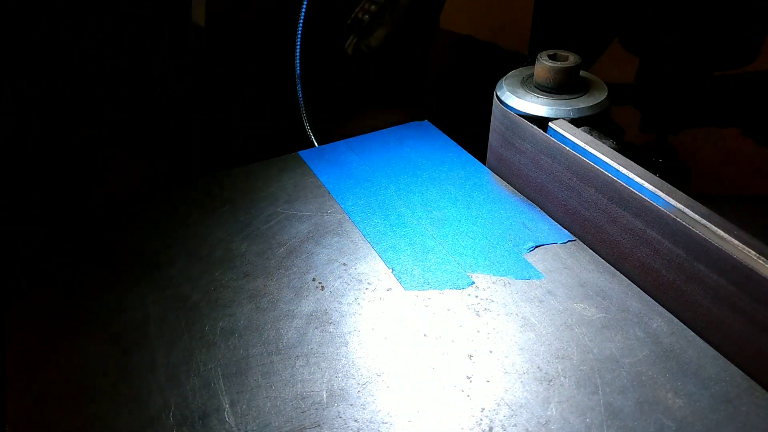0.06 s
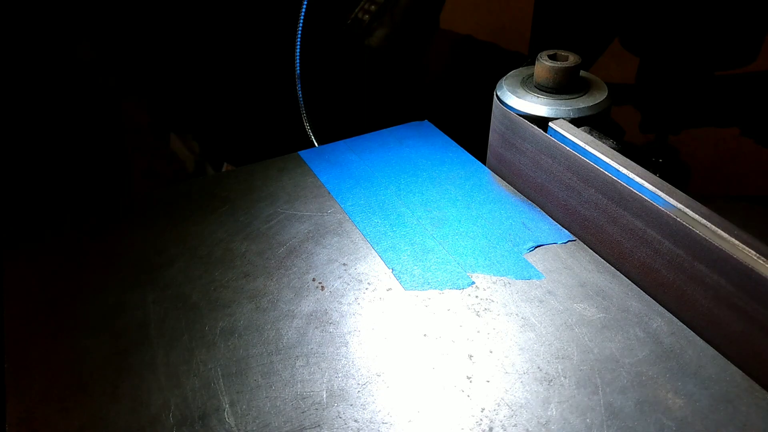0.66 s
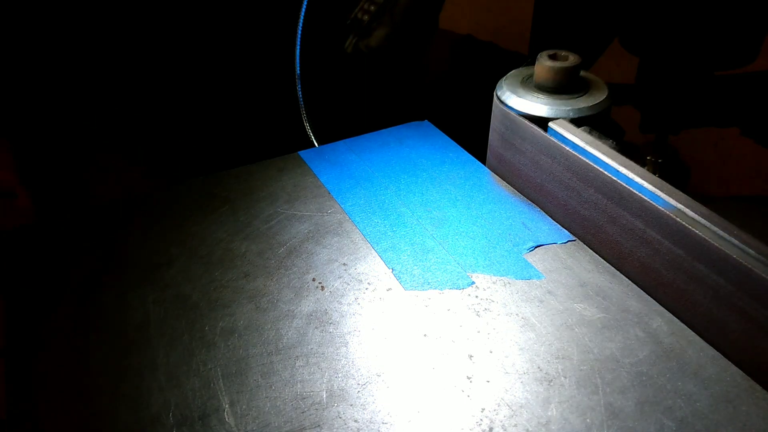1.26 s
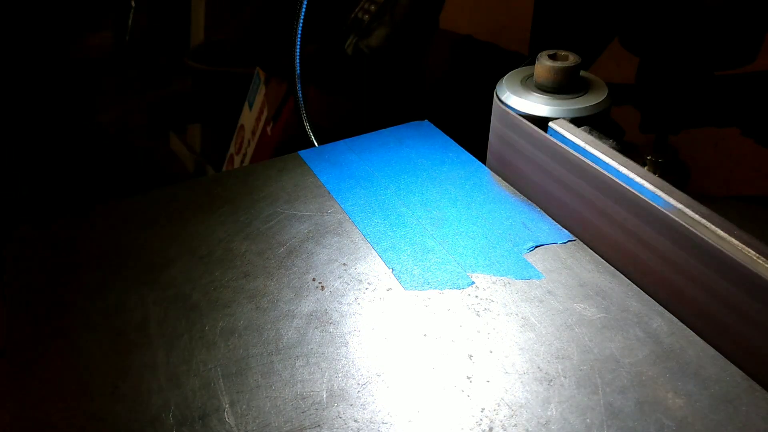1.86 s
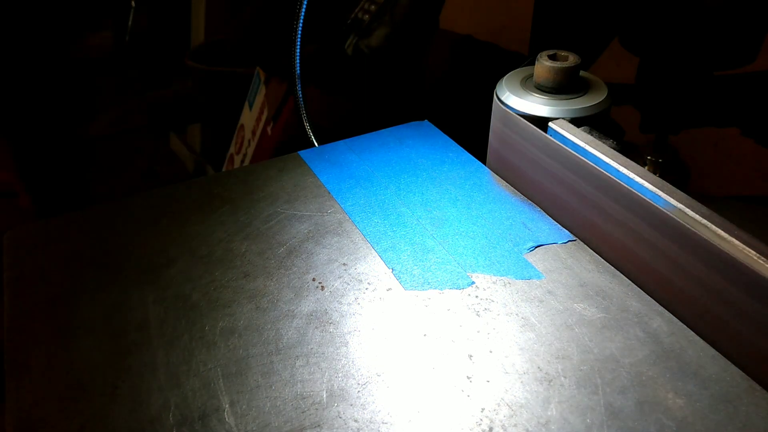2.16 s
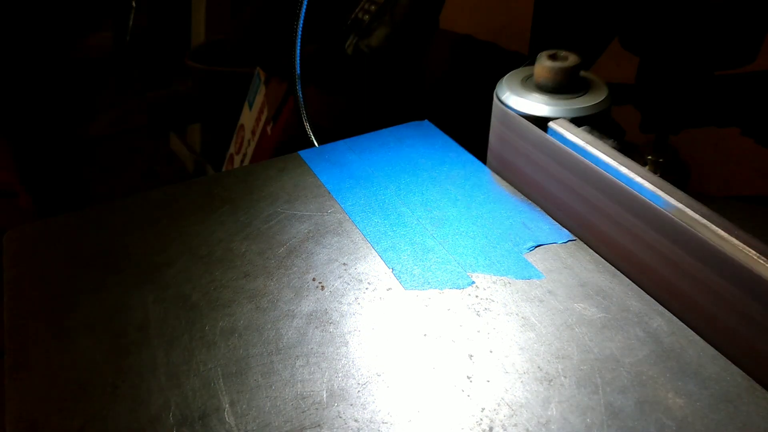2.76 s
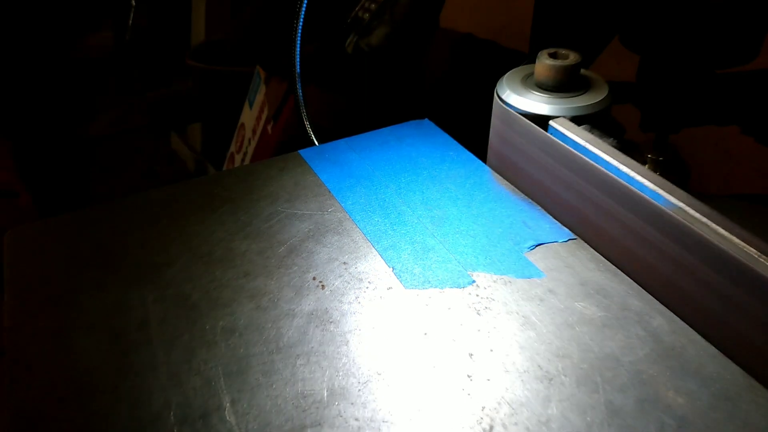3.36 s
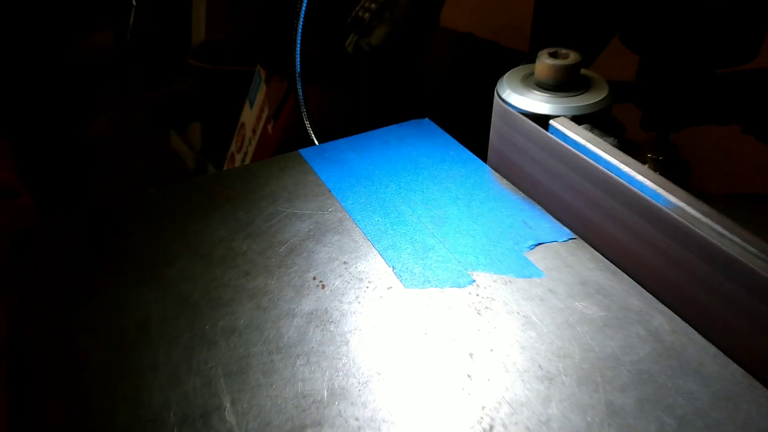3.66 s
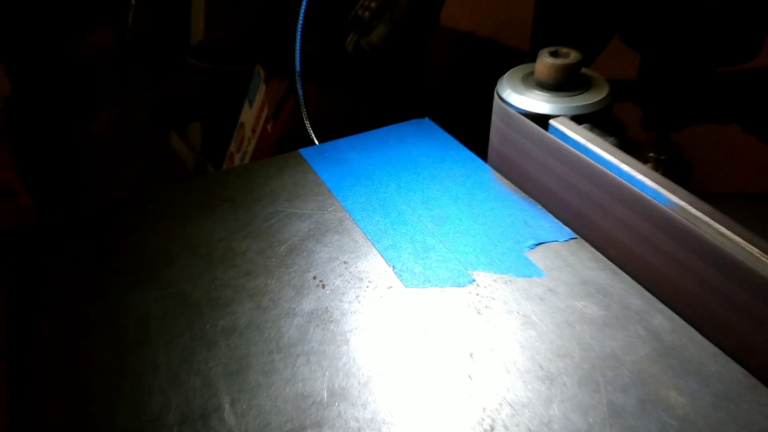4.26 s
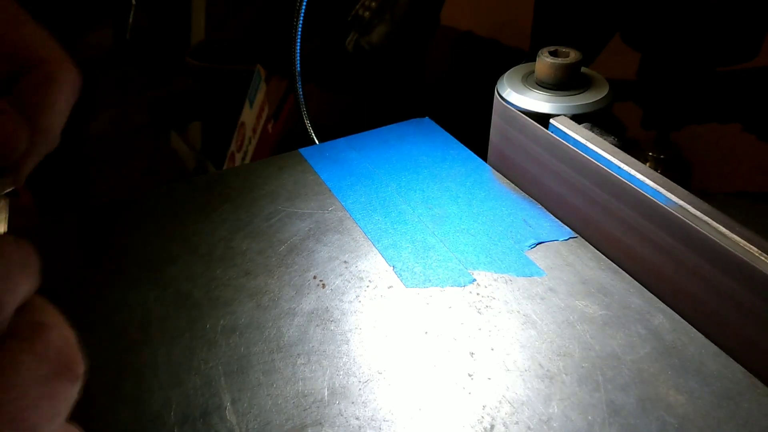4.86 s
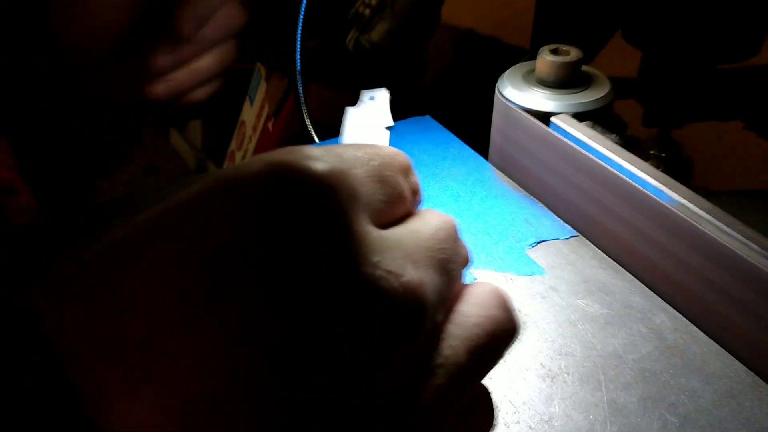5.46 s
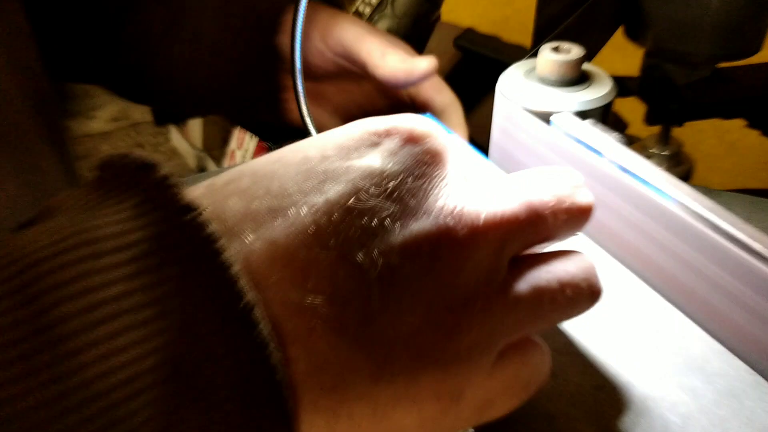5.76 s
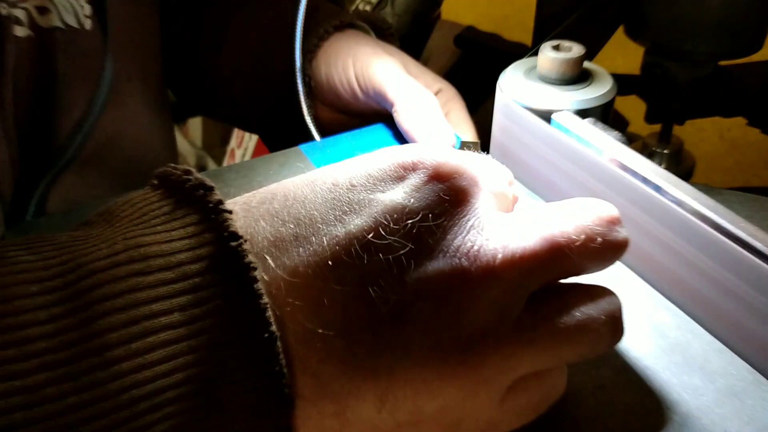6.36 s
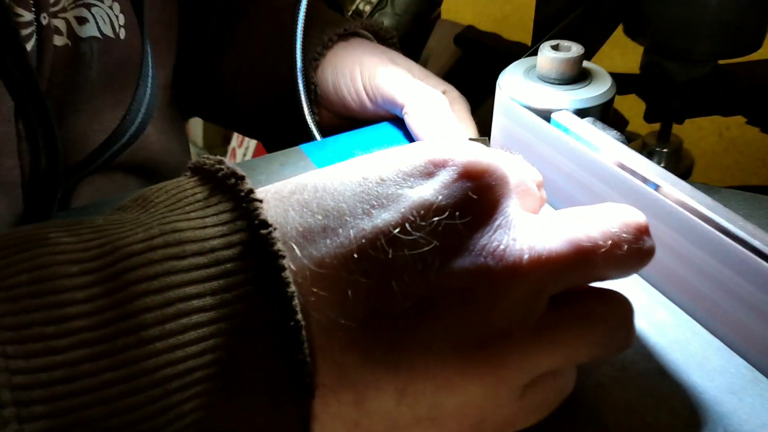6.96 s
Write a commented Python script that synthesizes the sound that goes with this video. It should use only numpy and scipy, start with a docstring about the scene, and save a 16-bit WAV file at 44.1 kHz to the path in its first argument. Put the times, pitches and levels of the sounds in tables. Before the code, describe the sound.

A few faint clicks, then a belt grinder squeals up to speed and runs with a steady rasp, with one sharp metal clink late on.

```python
"""Faint handling ticks and a few knocks in a quiet workshop, then a switch snaps and a belt grinder
winds up. The belt slips and squeals on the climb, the motor whines, and it settles into a steady rasp.
The same grit comes round every turn, so the rasp repeats; the seam slaps over wheels and platen.
Near the end a hand shades the belt and a small steel part clinks down on the work table."""
import sys
import numpy as np
from scipy import signal
from scipy.fft import rfft, irfft
from scipy.io import wavfile

SR = 44100
rng = np.random.default_rng(int(sys.argv[2]) if len(sys.argv) > 2 else 0)


def to_wav(sig):
    """Store sig (one row per channel, or 1-D mono) as 16-bit WAV at the path in sys.argv[1].

    Samples outside -1..1 are clipped; the rate is SR.
    """
    pcm = np.clip(np.atleast_2d(sig), -1, 1) * 32767
    pcm = np.round(pcm).astype(np.int16)
    wavfile.write(sys.argv[1], SR, pcm.T)  # frames by channels


N = 318402
TIME = np.arange(N) / SR
START_S, TURN_S, SEAM_AT_S = 1.55, .21502, 3.6985  # motor starts; one turn at full speed; a seam pass

# room tone: (frequency [Hz], relative density [dB])
AIR_COLOUR = [(15, -33), (25, 15), (49, -4), (75, 1), (391, -13.5), (707, -16.5), (1120, -22.5),
              (2020, -23), (8440, -32.5), (15700, -30)]
# workshop reverb: (frequency [Hz], t60 [s])
ROOM_DECAY = [(150, 0.19), (1000, 0.11), (3000, 0.16), (12000, 0.061)]
# ticks and rubs: (time [s], level [dB], centre [Hz], width [Hz], decay [s])
HANDLING_PUFFS = [(0.0647, -51, 2030, 1000, 0.0018), (.367, -61, 800, 420, 0.0035),
                  (.376, -70, 6000, 4000, .004), (.484, -68, 3000, 3500, .004), (.54, -65, 320, 220, 0.017),
                  (0.573, -67, 320, 140, .025), (.575, -75, 5500, 6000, .02), (.617, -72, 5500, 4000, .003),
                  (.703, -71, 2500, 3000, .004), (.738, -65, 3500, 6300, 0.0073),
                  (1.021, -68, 350, 420, 0.022), (1.069, -61, 294, 330, 0.019),
                  (1.072, -74, 2200, 2500, .006)]
# table knocks, switch and start-up rattles: (time [s], gain [dB], crack treble [dB], table ring [dB])
KNOCK_CUES = [(0.7593, -35, 2.5, -2), (1.2218, -38.5, 5, -11), (1.506, -41, -14, -6), (1.588, -45, -4, -2),
              (1.614, -45, -11, -3), (1.645, -44, -10, -5), (6.1629, -15.5, -22, -8)]
# metal-on-metal crack: (frequency [Hz], relative density [dB])
CRACK_COLOUR = [(120, -54), (200, -34), (472, -9.5), (997, -27), (1310, 0.5), (1570, -11), (1850, -2.5),
                (2980, -20), (9240, -26), (12600, -16), (15700, -38)]
# ring of the work table: (frequency [Hz], relative level [dB], t60 [s])
TABLE_MODES = [(477, 2.5, 0.15), (890, -3, .07), (1102, 12, 0.031), (1310, -19, 0.042), (1450, -22, 0.047),
               (2400, -1, 0.1), (2620, 12.5, 0.062), (2750, 10, 0.039), (2660, -9, .1)]
# thuds of the stand: (time [s], level [dB], centre [Hz], width [Hz], decay [s])
JOLT_PUFFS = [(0.766, -60, 47, 37, .17), (1.24, -48.5, 36.3, 14, 0.11), (1.83, -48, 39, 14, .18),
              (2.12, -43, 86, 35, 0.22), (2.3, -38.5, 240, 140, 0.075)]
# the frame's rumble: (frequency [Hz], relative density [dB])
FRAME_COLOUR = [(20, -40), (45, -30), (75, -13.5), (125, -11), (165, -16.5), (275, -10.5), (320, -15),
                (392, -10), (490, -8), (690, -7), (760, -11), (1000, -10), (1300, -18), (2000, -64)]
# the belt's hiss: (frequency [Hz], relative density [dB])
BELT_COLOUR = [(700, -43), (1200, -20), (1550, -8.5), (2150, -1.5), (2930, -2), (3520, -2.5), (4500, -3.5),
               (5050, -4.5), (5400, -8.5), (7200, -7.5), (8100, -12), (11000, -10.5), (13500, -9),
               (15700, -10.5)]
# resonances of guard, table and wheels: (centre [Hz], width [Hz], lift [dB])
BODY_MODES = [(130.4, 29, -2.5), (404.5, 53, 8), (2070, 79, 1), (2625, 50, 0.5), (2883, 33, 7),
              (3180, 40, 5), (3720, 29, 5), (3917, 17, 11.5), (4285, 100, 7.5), (4220, 100, -1.5),
              (4678, 44, 10), (5000, 105, 3.5)]
# resonances that fade with speed: (centre [Hz], width [Hz], lift toward standstill [dB])
SLOW_MODES = [(90, 37, 4.5), (270, 55, 11.5), (400, 240, -2), (1060, 210, 5), (1650, 850, 15),
              (4730, 1500, -9.5)]
# noise that comes round every turn: (frequency at full speed [Hz], share of power [0-1])
LOOPED_SHARE = [(40, 0.8), (130, 0.04), (900, 0.55), (2200, 0.37), (4200, 0.64), (6500, 0), (11000, 1),
                (16000, 0.08)]
# how each register builds with speed: (centre [Hz], exponent, knee [share of full speed])
REGISTER_GROWTH = [(130, 3.2, .35), (700, 1.96, 0.75), (2410, 2.74, 0.5), (4330, 1.69, 4.4),
                   (9100, 1.62, 3.8)]
# stereo focus of the rasp: (frequency [Hz], coherence [clipped to 0-0.99])
STEREO_COHERENCE = [(35, -3), (90, -0.3), (150, 1), (300, 0.53), (550, 0.57), (1000, 0.44), (2000, -0.2),
                    (4300, 0.86), (8000, -0.6), (15000, 0)]
# stereo phase of the rasp: (frequency [Hz], left lead [rad])
STEREO_LEAD = [(40, 0.7), (130, -2.03), (300, 0.1), (600, -0.08), (1100, -0.8), (2000, -1.25), (4300, -2),
               (15000, -0.5)]
# pan of the rasp: (frequency [Hz], left minus right [dB])
STEREO_PAN = [(60, -19), (92, -8), (140, -2), (210, -0.5), (330, -8), (500, -4), (770, -1), (1170, 0),
              (1790, 2), (2740, 1.5), (4190, -3.5), (6410, -4.5), (9810, -2.5), (15000, -3)]
# whistles of backing, coarse grit, weave and its octave: (pitch at full speed [Hz], width [Hz])
WHISTLE_BANDS = [(2950, 280), (4320, 220), (6965, 85), (13900, 210)]
# the same four whistles: (base level [dB], rise per doubling of speed [dB], throb [dB])
WHISTLE_LEVELS = [(-38.5, 3, 2.3), (-34, 7.5, 2.9), (-38.3, 10.5, 2.2), (-39.7, 13, 2)]
# the weave's whistle swells and eases: (time [s], gain [dB])
WEAVE_FADER = [(3.1, -2), (3.85, 7), (4.3, 4.5), (6.0, 3.5), (6.8, 6)]
# motor housing resonances: (centre [Hz], width [Hz], gain [dB])
HOUSING_MODES = [(453, 58, -42.5), (560.2, 22, -37.5)]
# seam on wheels and platen: (place in the turn [0-1], pitch [Hz], t60 [s], level at full speed [dB])
SEAM_HITS = [(.005, 2050, .019, -19.4), (.009, 1450, .008, -19), (.003, 2900, .006, -17),
             (.005, 133, .12, -29.7), (.005, 90, .1, -32.5), (.02, 450, .04, -29), (.14, 398, .09, -26.8),
             (.17, 690, .03, -36), (.475, 2250, .012, -24), (.5, 410, .06, -34), (.86, 385, .07, -32),
             (.88, 4350, .03, -25)]
# belt slips: (start [s], length [s], pitch at full speed [Hz], squeal [dB], added scrape [dB])
SLIP_CUES = [(1.669, .11, 14300, -41, 5), (1.779, 0.11, 4380, -41.5, 4.5), (1.87, .036, 6900, -31.5, 7.5),
             (1.928, 0.064, 6930, -32, 7.5), (1.95, .16, 2900, -41.5, -0.5), (2.116, 0.11, 7030, -42, -1),
             (2.251, 0.077, 6860, -36.5, -2), (2.298, 0.135, 4440, -38, 2.5)]
# where the added scrape lands: (frequency [Hz], share [0-1])
SCRAPE_SHARE = [(300, 0), (1000, 0.061), (2400, 0.7), (9000, 1)]
# a hand reaches between belt and microphone: (time [s], cover [0-1])
HAND_COVER = [(5.3, 0), (5.72, 0.77), (6.05, 1), (6.25, 0.53), (7.2, 0.6)]
# the hand's shadow: (frequency [Hz], gain at full cover [dB])
HAND_EQ = [(130, -0.3), (700, 0.1), (2400, -0.6), (4300, -2.5), (6500, 1), (9000, -1.9), (14000, -2.5)]
# ring of the steel part: (frequency [Hz], relative level [dB], t60 [s])
PART_MODES = [(875, 0.5, 0.11), (1260, 0, .13), (2420, -3, 0.17), (2640, -3, .15)]


def gain_of(db):
    """Decibels to amplitude."""
    return 10 ** (np.asarray(db) / 20)


def unit_rms(x):
    """Scales to rms 1."""
    return x / np.sqrt(np.mean(x ** 2) + 1e-20)


def curve(points, hz):
    """Reads a table along a log-frequency axis."""
    f, value = np.transpose(points)
    return np.interp(np.log(hz + 1), np.log(f + 1), value)


def bell(hz, centre, width, height):
    """A bell-shaped resonance curve."""
    return height / (1 + (2 * (hz - centre) / width) ** 2)


def pan(left_db):
    """Channel gains that put the left left_db above the right."""
    return gain_of([[left_db / 2], [-left_db / 2]])


def add(mix, s, sound):
    """Mixes a sound in at time s."""
    part = mix[..., max(round(s * SR), 0):][..., :sound.shape[-1]]
    part += sound[..., :part.shape[-1]]


def spectra(x, size=2048):
    """Short-time spectra: Hz as a column, frame times, and bins x frames."""
    hz, t, z = signal.stft(x, SR, nperseg=size, noverlap=size * 3 // 4)
    return hz[:, None], t, z


def waves(z, size=2048):
    """Short-time spectra back to sound."""
    return signal.istft(z, nperseg=size, noverlap=size * 3 // 4)[1][..., :N]


def coloured_noise(size, colour):
    """Two unrelated noises with a table's spectrum, at rms 1."""
    eq = gain_of(curve(colour, np.fft.rfftfreq(size, 1 / SR)))
    return unit_rms(irfft(rfft(rng.standard_normal((2, size))) * eq, size))


def resonate(x, hz, *widths):
    """One resonator per width, in series; they can follow a pitch curve."""
    carrier = np.exp(2j * np.pi * np.cumsum(hz * np.ones(x.shape[-1])) / SR)
    for width in widths:
        pole = np.exp(-np.pi * width / SR)
        x = 2 * (carrier * signal.lfilter([1 - pole], [1, -pole], x / carrier + 1e-18)).real
    return x


def drift(rate_hz):
    """Slow random wander of rms 1."""
    rolloff = np.exp(-(np.fft.rfftfreq(N, 1 / SR) / rate_hz) ** 2)
    return unit_rms(irfft(rfft(rng.standard_normal(N)) * rolloff, N))


def puffs(cues):
    """Brief puffs of noise, each in one broad resonance."""
    out, t = np.zeros(N), np.arange(SR) / SR
    for s, db, hz, width, decay in cues:
        puff = unit_rms(resonate(rng.standard_normal(2 * SR), hz, width, width)[SR:])
        add(out, s, gain_of(db) * puff * np.exp(-t / decay) * (1 - np.exp(-10 * t / decay)))
    return out


def room(x, wet_db):
    """Direct sound plus workshop reflections, each band dying at its own rate."""
    echoes = rng.standard_normal((2, SR // 2)) * (rng.random((2, SR // 2)) < .1)
    hz, t, z = spectra(echoes, size=256)
    tail = waves(z * gain_of(-60 * t / curve(ROOM_DECAY, hz)), size=256)
    wet = signal.fftconvolve(np.atleast_2d(x), tail / np.linalg.norm(tail[0]), axes=1)[:, :N]
    return x + gain_of(wet_db) * wet


def room_tone(level_db=-70.5, spread=.83):
    """A wide bed of quiet workshop air."""
    mid, side = coloured_noise(N, AIR_COLOUR)
    return gain_of(level_db) * np.array([mid + spread * side, mid - spread * side])


def handling():
    """Small ticks and soft rubs, heard in the room."""
    return room(puffs(HANDLING_PUFFS), wet_db=-7)


def knocks(crack_s=.0096, crack_db=-8, ring_db=-17, contact_s=.00092):
    """A short crack of metal on metal, with the table ringing after it."""
    out, t = np.zeros((2, N)), np.arange(SR // 3) / SR
    lowpass, highpass = (signal.butter(4, 3000, kind, fs=SR, output="sos") for kind in ("low", "high"))
    for s, db, treble_db, table_db in KNOCK_CUES:
        noise = coloured_noise(len(t), CRACK_COLOUR)
        crack = signal.sosfilt(lowpass, noise) + gain_of(treble_db) * signal.sosfilt(highpass, noise)
        crack *= gain_of(crack_db) * np.exp(-t / crack_s)
        ring = np.zeros_like(crack)
        for hz, mode_db, t60 in TABLE_MODES:
            cycles = hz * t + rng.random() + .15 * rng.random((2, 1))
            ring += gain_of(mode_db - 60 * t / t60) * np.sin(2 * np.pi * cycles)
        ring *= gain_of(ring_db + table_db) * (1 - np.exp(-t / contact_s))
        add(out, s, gain_of(db) * (crack + ring))
    return room(out, wet_db=-6)


def stand_jolts():
    """Low thuds as the stand jolts after a knock and as the belt gathers speed."""
    return puffs(JOLT_PUFFS)


def belt_motion(jerk=.126, jerk_s=.055, climb_per_s=.477, overshoot=.022, settle_s=.1, flutter=.000355):
    """The belt jerks, climbs, overshoots and settles: speed (1 = full) and turns (whole at the seam)."""
    age = np.maximum(TIME - START_S, 0)
    climb = jerk * (1 - np.exp(-age / jerk_s)) + climb_per_s * age
    past_top_s = np.maximum(climb - 1 - overshoot, 0) / climb_per_s
    settle = 1 + overshoot * np.exp(-(past_top_s / settle_s) ** 2)
    speed = np.minimum(climb, settle) * (1 + flutter * drift(rate_hz=10.44))
    turns = np.cumsum(speed) / SR / TURN_S
    return speed, turns - np.interp(SEAM_AT_S, TIME, turns)


def belt_loop(turns, top_hz=SR / 2, size=2 ** 16):
    """A random profile round the belt, played as it passes; it reaches top_hz at full speed."""
    spectrum = rfft(rng.standard_normal(size))
    profile = unit_rms(irfft(spectrum * (np.arange(len(spectrum)) < top_hz * TURN_S)))
    return np.interp(turns % 1, np.arange(size) / size, profile)


def belt_bite(speed, tight_speed=.2, slack_db=-8, lead_s=.022):
    """Fade-in: the slack belt rasps softly until the motor has pulled it tight."""
    fade = np.clip((TIME - START_S + lead_s) / .014, 0, 1)
    return fade * gain_of(slack_db * (1 - np.minimum(speed / tight_speed, 1) ** 4))


def growth_db(speed, hz):
    """Each register grows as a power of speed, levelling off past its knee; 0 dB at full speed."""
    centres, total = [row[0] for row in REGISTER_GROWTH], 0
    for solo, (_, exponent, knee) in zip(np.eye(len(centres)), REGISTER_GROWTH):
        weight = curve(np.transpose([centres, solo]), hz)
        total += weight * 10 * exponent * np.log10((1 + knee ** 2) / (1 + (knee / speed) ** 2))
    return total


def stereo_image(z, hz):
    """Blends two unrelated spectra into left and right, keeping the level of their sum."""
    same = np.clip(curve(STEREO_COHERENCE, hz), 0, .99)
    lead, lean = curve(STEREO_LEAD, hz), gain_of(curve(STEREO_PAN, hz) / 2)
    right = (same * z[0] + np.sqrt(1 - same ** 2) * z[1]) * np.exp(-1j * lead)
    sum_level = np.sqrt(lean ** 2 + lean ** -2 + 2 * same * np.cos(lead))
    return np.array([z[0] * lean, right / lean]) * 2 / sum_level


def belt_rasp(speed, turns, frame_db=-37, belt_db=-27, wear_db=.7, clump_db=.78, min_pace=.13):
    """Looping grit and fresh friction noise shake the belt, the table and the frame."""
    grit = np.array([belt_loop(turns) for _ in range(2)]) * np.sqrt(speed)
    wear = gain_of(wear_db * belt_loop(turns, top_hz=35) + clump_db * belt_loop(turns, top_hz=615))
    hz, t, looped = spectra(grit * wear)
    fresh = spectra(rng.standard_normal((2, N)) * wear)[2]
    pace = np.maximum(np.interp(t, TIME, speed), min_pace)
    share = np.clip(curve(LOOPED_SHARE, hz / pace), 0, 1)
    rasp = stereo_image(np.sqrt(share) * looped + np.sqrt(1 - share) * fresh, hz)
    body_db = sum(bell(hz, *mode) for mode in BODY_MODES)
    slow_db = sum(bell(hz, *mode) for mode in SLOW_MODES) * (1 - pace)
    slip_db = sum(db * slip_envelope(t, start, length) for start, length, _, _, db in SLIP_CUES)
    scrape_db = slip_db * curve(SCRAPE_SHARE, hz)
    shade_db = hand_cover(t) * curve(HAND_EQ, hz)
    rasp *= gain_of(body_db + slow_db + growth_db(pace, hz) + scrape_db + shade_db)
    out, at_speed = np.zeros((2, N)), TIME > SEAM_AT_S
    for colour, db in (FRAME_COLOUR, frame_db), (BELT_COLOUR, belt_db):
        layer = waves(rasp * gain_of(curve(colour, hz)))
        out += gain_of(db) * layer / layer.mean(0)[at_speed].std()
    return out * belt_bite(speed)


def belt_whistles(speed, turns):
    """Grit and weave sing over the wheel: fuzzy whistles that rise with speed and throb each turn."""
    slip = .045 * np.clip(1 - speed, 0, 1) ** 2 * drift(rate_hz=120)  # until the belt catches up
    swells = 0, 0, np.interp(TIME, *np.transpose(WEAVE_FADER)), 0
    out = np.zeros((2, N))
    for band, levels, swell_db in zip(WHISTLE_BANDS, WHISTLE_LEVELS, swells):
        (full_hz, width), (db, rise_db, throb_db) = band, levels
        share = np.clip(curve(LOOPED_SHARE, full_hz), 0, 1)
        looped = np.array([belt_loop(turns) for _ in range(2)])
        drive = np.sqrt(share * speed) * looped + np.sqrt(1 - share) * rng.standard_normal((2, N))
        whistle = unit_rms(resonate(drive, full_hz * speed * (1 + slip), width, 3 * width))
        shade_db = hand_cover(TIME) * curve(HAND_EQ, full_hz)
        level_db = db + rise_db * np.log2(speed + 1e-6) + swell_db + shade_db
        out += whistle * gain_of(level_db + throb_db * belt_loop(turns, top_hz=25))
    return out * belt_bite(speed) * pan(left_db=-4)


def motor_whine(speed, full_hz=553, waver_db=1.22, hand_db=-1):
    """The whine climbs with speed and blooms where it meets a resonance of the housing."""
    hz = full_hz * speed
    bloom = sum(bell(hz, centre, width, gain_of(db)) for centre, width, db in HOUSING_MODES)
    tone = np.sqrt(2) * np.sin(2 * np.pi * np.cumsum(hz) / SR + .14 * drift(rate_hz=15))
    fader = gain_of(waver_db * drift(rate_hz=21) + hand_db * hand_cover(TIME))
    return speed * bloom * tone * fader * pan(left_db=-9)


def stand_sway(speed, hz=42, width_hz=16, level_db=-56, sway_speed=.29, early_db=-9, hand_db=-3):
    """The shaken stand booms at one low resonance, fully from sway_speed on; the hand steadies it."""
    boom = unit_rms(resonate(rng.standard_normal(N), hz, width_hz, width_hz))
    early = gain_of(early_db)
    shake = np.interp(speed, [0, 1e-3, .9 * sway_speed, sway_speed], [0, early, early, 1])
    return boom * shake * gain_of(level_db + hand_db * hand_cover(TIME))


def seam_slaps(speed, turns, vary_db=1.5):
    """Once a turn the belt's joint ticks and thumps over wheels and platen, harder with speed."""
    out, t = np.zeros(N), np.arange(SR // 5) / SR
    for place, hz, t60, db in SEAM_HITS:
        ring = gain_of(db - 60 * t / t60) * np.sin(2 * np.pi * hz * t) * (1 - np.exp(-hz * t))
        for i in np.flatnonzero(np.diff(np.floor(turns - place)) > 0):
            add(out, i / SR, ring * speed[i] ** 2 * gain_of(vary_db * rng.standard_normal()))
    return room(out, wet_db=-9)


def slip_envelope(t, start, length, rise_s=.022, break_s=.0093):
    """A slip builds, holds, and breaks off as the belt grips."""
    return np.clip(np.minimum((t - start) / rise_s, (start + length - t) / break_s), 0, 1)


def slip_squeals(speed, width_hz=110, jitter=.016):
    """Each slip is a short, unsteady squeal whose pitch rides on the belt's speed."""
    out = np.zeros((2, N))
    pace = speed * (1 + jitter * drift(rate_hz=90))
    for start, length, full_hz, db, _ in SLIP_CUES:
        span = (TIME >= start) & (TIME < start + length)
        friction = rng.standard_normal((2, SR // 2))[:, :span.sum()]
        squeal = unit_rms(resonate(friction, full_hz * pace[span], width_hz, 3 * width_hz))
        add(out, start, gain_of(db) * squeal * slip_envelope(TIME[span], start, length))
    return out


def hand_cover(t):
    """How far the hand covers the belt at times t."""
    return np.interp(t, *np.transpose(HAND_COVER))


def steel_part(at_s=6.164, level_db=-26):
    """The small part clinks and rings briefly as it meets the table."""
    out, t = np.zeros(N), np.arange(SR // 3) / SR
    for hz, db, t60 in PART_MODES:
        add(out, at_s, gain_of(level_db + db - 60 * t / t60) * np.sin(2 * np.pi * hz * t))
    return room(out, wet_db=-8)


def scene(hand_pan_db=1.5):
    """The mix: grinder layers, spot effects and room tone."""
    speed, turns = belt_motion()
    grinder = belt_rasp(speed, turns) + belt_whistles(speed, turns) + slip_squeals(speed)
    grinder += seam_slaps(speed, turns) + motor_whine(speed) + stand_sway(speed)
    right_db = hand_pan_db * hand_cover(TIME)  # the hand shields the left side most
    grinder *= gain_of(np.outer([-.5, .5], right_db - right_db.mean()))
    return grinder + stand_jolts() + knocks() + steel_part() + handling() + room_tone()


def record(dry):
    """A low cut at 32 Hz and a steep high cut at 15.8 kHz."""
    thin = signal.sosfilt(signal.butter(3, 32, "high", fs=SR, output="sos"), dry)
    high_cut = signal.firwin(1023, 15800, window=("kaiser", 8), fs=SR)
    return signal.oaconvolve(thin, high_cut[None], "same")


dry = scene()
out = record(dry)
to_wav(out)
```